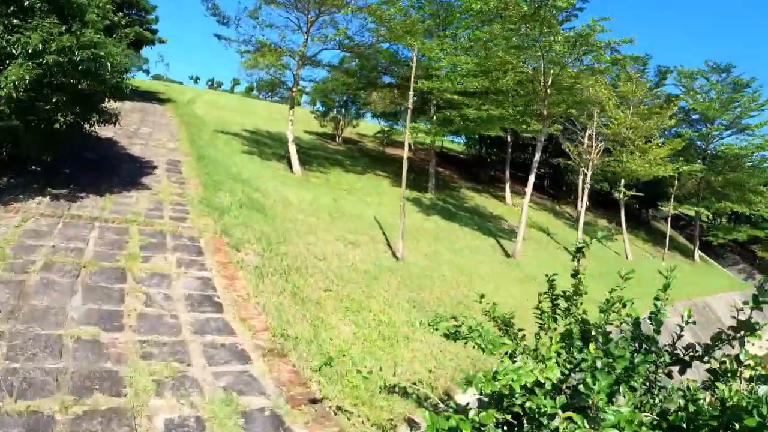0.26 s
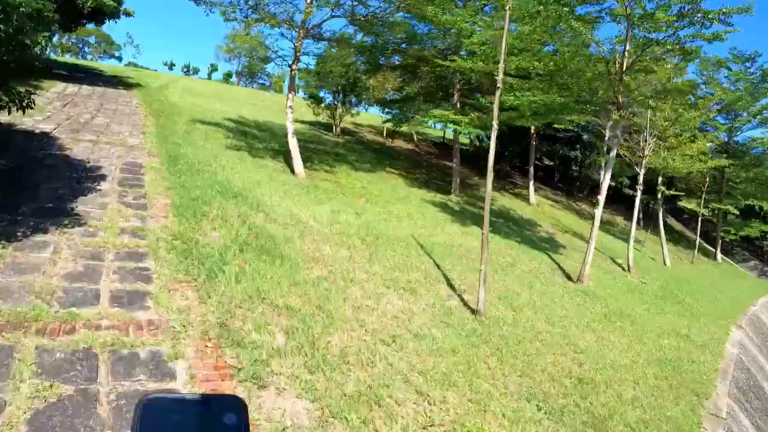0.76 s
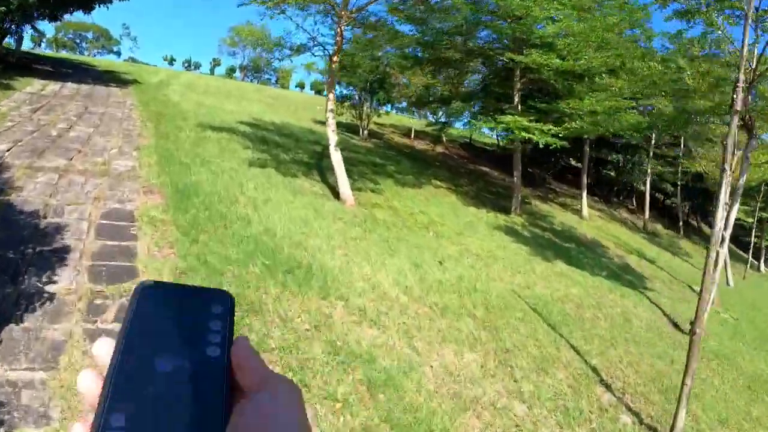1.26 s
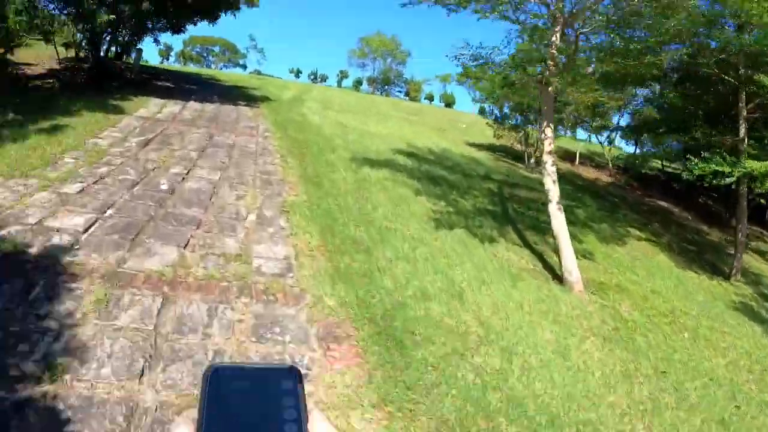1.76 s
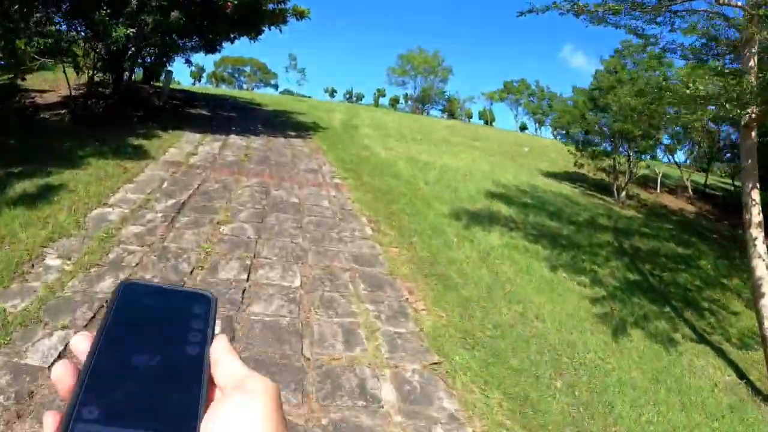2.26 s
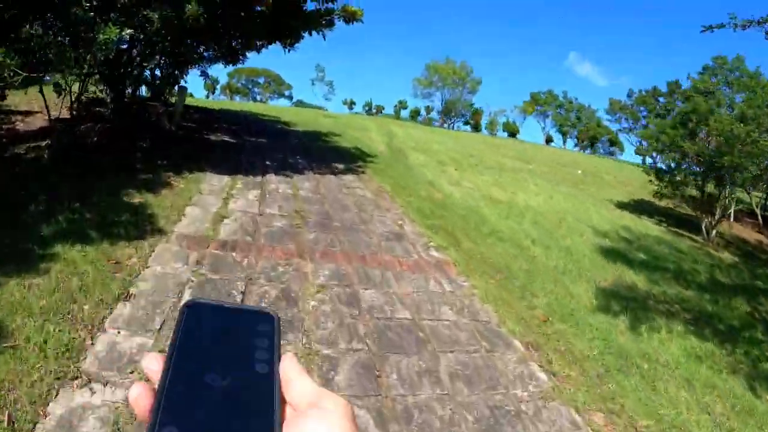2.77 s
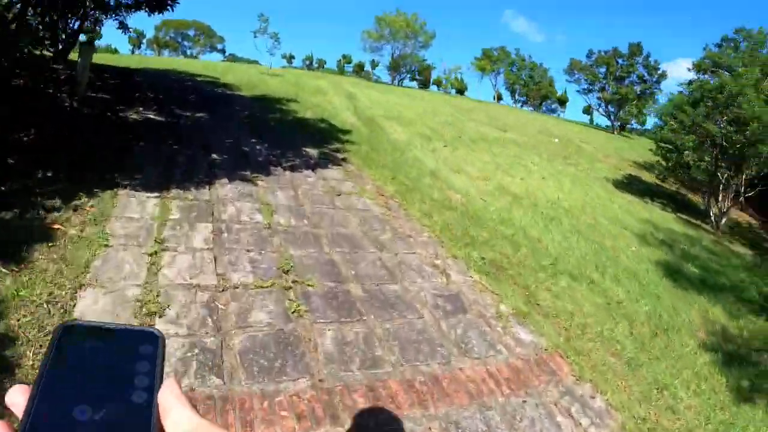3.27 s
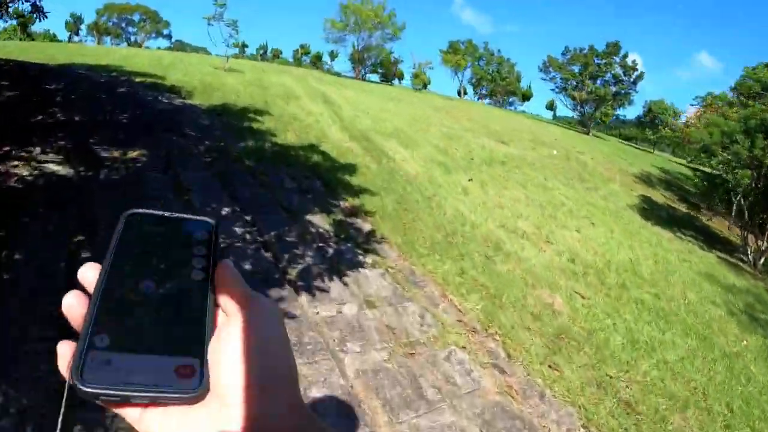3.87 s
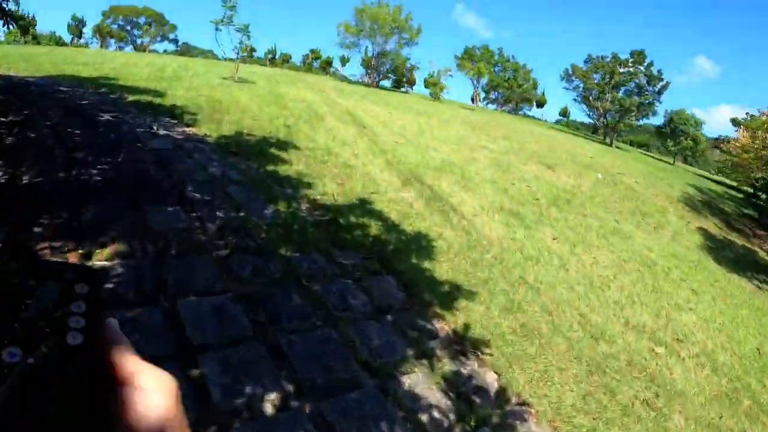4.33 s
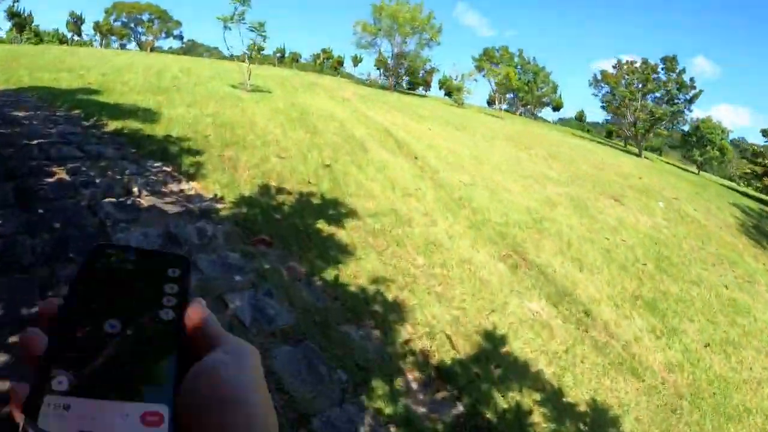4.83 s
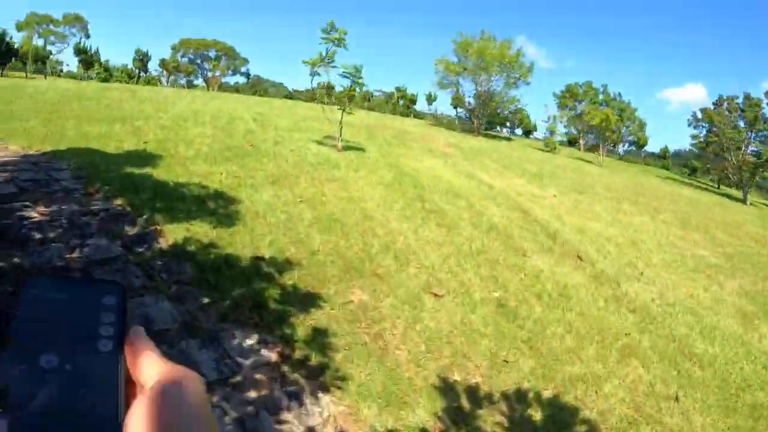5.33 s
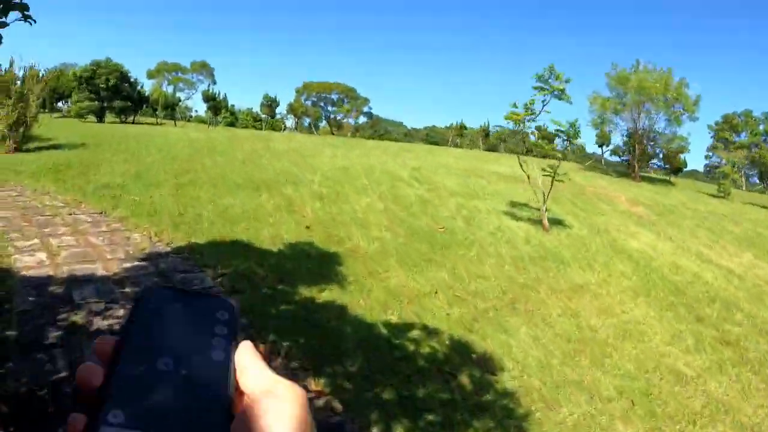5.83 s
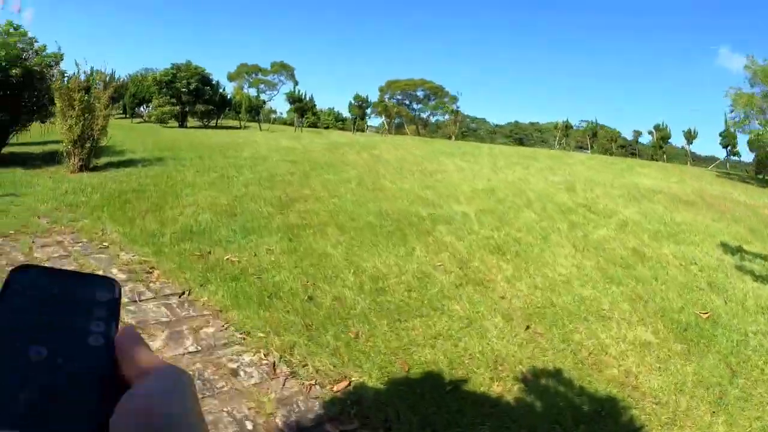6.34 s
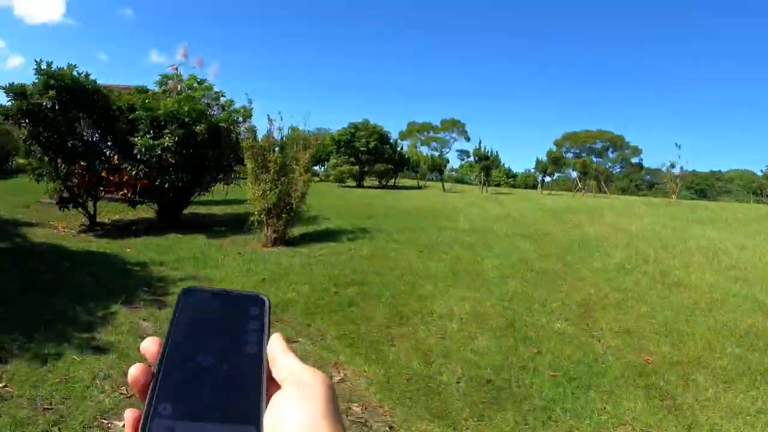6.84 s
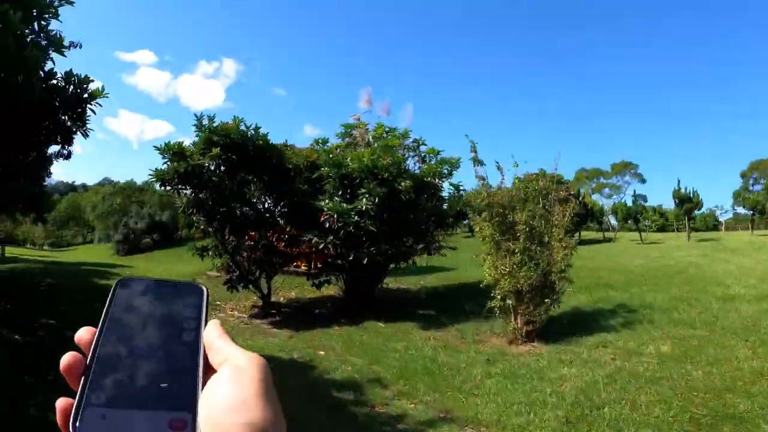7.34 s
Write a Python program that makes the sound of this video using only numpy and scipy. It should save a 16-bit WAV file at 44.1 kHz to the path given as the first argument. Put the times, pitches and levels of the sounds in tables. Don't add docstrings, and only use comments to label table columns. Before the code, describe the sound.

From 0 to about 2.1 seconds the sound is quiet and mono: soft low footfalls on stone, a few firmer at the very start, small dry ticks, short strap rubs and faint air. Around 2.2 seconds it opens to stereo, and from 2.35 to 2.8 a cluster of loud hollow plastic clacks hits close at the right, thinner at the left. From 3 to 4.6 come lighter rattles, a scrape near 3.3, knocks near 3.45 and 4.0, gritty steps and crackling grass swishes over steady cloth rustle. Between 4.6 and 6.3 steps thump quickly with moderate, scattered knocks and snaps. A hard clack lands at 6.47, more follow, and from 7.1 to 7.6 rapid heavy knocks, shoves and thuds crowd together, slightly overloaded. Wind and leaf hiss remain faint throughout.

```python
import sys
import numpy as np
from scipy import signal
from scipy.io import wavfile

SR = 44100
rng = np.random.default_rng(int(sys.argv[2]) if len(sys.argv) > 2 else 0)


def linear_from_db(decibels):
    return 10 ** (np.asarray(decibels, float) / 20)


def store_pcm(level_fs):
    pcm = np.round(np.clip(level_fs, -1, 1) * 32767).astype(np.int16)
    wavfile.write(sys.argv[1], SR, np.atleast_2d(pcm).T)


N = 335160
REVERSED = np.array([[-1], [1]])


def ring(x, hz, t60):
    radius, angle = linear_from_db(-60 / (t60 * SR)), 2 * np.pi * hz / SR
    return signal.lfilter([0, np.sin(angle)], [1, -2 * radius * np.cos(angle), radius ** 2], x + 1e-18)


def band(x, lo_hz, hi_hz):
    return signal.sosfilt(signal.butter(2, [lo_hz, hi_hz], "band", fs=SR, output="sos"), x + 1e-18)


def soft(x, hz):
    return signal.sosfilt(signal.butter(4, hz, fs=SR, output="sos"), x + 1e-18)


def rms_one(x):
    return x / np.sqrt(np.mean(x ** 2))


def by_air(x):
    return np.array([x, np.roll(x, shift=2)])


def blows(times, level_db, spread_s, count):
    out, chance = np.zeros(N), rng.random((len(times), 2 * count))
    for k in range(count):
        late = chance[:, k] * (k > 0)
        at = np.clip(((times + spread_s * late) * SR).astype(int), 0, N - 1)
        push = np.cbrt(2 * chance[:, count + k] - 1) if k else -1
        np.add.at(out, at, push * linear_from_db(level_db) * (1 - .65 * late))
    return out


def swings(rows):
    s, level_db, hz, swell = np.transpose(rows)[:, :, None]
    t, out = np.arange(int(.04 * SR)) / SR, np.zeros(N + SR)
    u = t / np.clip(swell, .001, .008)
    envelope = (u * np.exp(1 - u)) ** 2
    at = (s * SR).astype(int) + np.arange(len(t))
    np.add.at(out, at, -linear_from_db(level_db) * envelope * np.sin(2 * np.pi * hz * t))
    return out[:N]


def strokes(rows):
    power = np.zeros(N)
    for centre, length, level_db in rows:
        at = np.arange(max(int((centre - 2 * length) * SR), 0), min(int((centre + length) * SR), N))
        u = (at / SR - centre) / length
        power[at] += linear_from_db(2 * level_db) * np.exp(-np.where(u < 0, 5.0, 11.0) * u ** 2)
    return np.sqrt(power)


def grains(per_s, spread_db):
    sizes = linear_from_db(spread_db * np.minimum(rng.exponential(1, N), 4)) * rng.choice([-1, 1], N)
    return rms_one(sizes * (rng.random(N) < per_s / SR))


def flicker(hz, depth_db):
    lowpass = signal.butter(2, hz, fs=SR / 20, output="sos")
    slow = signal.sosfilt(lowpass, rng.standard_normal(N // 20 + 999))[998:]
    slow = np.minimum(rms_one(slow), 1.2)
    return linear_from_db(depth_db * np.interp(np.arange(N) / 20, np.arange(len(slow)), slow))


def casing(force, modes, uneven=None):
    out = np.zeros((2, N))
    for k, (hz, right_db, left_db, t60) in enumerate(modes):
        share = 1 if uneven is None else uneven[k]
        left_sign = 1 if 3500 < hz < 4500 or hz > 7800 else -1
        gains = np.array([[left_sign * linear_from_db(left_db)], [linear_from_db(right_db)]])
        out += ring(force * share, hz, min(t60, .02)) * (-1) ** k * gains
    return out


# start in seconds, knock level in dB,
# hard tick level in dB, battery door pitch in Hz.
KNOCKS = [(2.354, -18.5, -27.5, 900), (2.474, -13, -25.5, 897), (2.552, -21.5, -40, 950),
          (2.674, -18, -28, 902), (2.782, -11, -21.5, 945), (3.124, -40, -50, 920), (3.255, -32, -52, 1270),
          (3.448, -19.5, -46.5, 870), (3.531, -27, -52, 939), (3.995, -19.5, -32, 845),
          (4.025, -34, -44, 760), (4.622, -45, -35.5, 810), (5.027, -24.5, -43.5, 924),
          (5.351, -21.5, -45, 867), (5.438, -39, -54, 950), (5.691, -20, -26.5, 930),
          (5.808, -29, -55, 760), (6.026, -20.5, -52, 895), (6.466, -10.5, -23.5, 925),
          (6.685, -17.5, -45.5, 900), (6.837, -21.5, -37, 864), (7.018, -16, -42.5, 905),
          (7.127, -11.5, -22.5, 980), (7.161, -19.5, -44.5, 870), (7.205, -23.5, -48.5, 940),
          (7.277, -11, -30, 942), (7.329, -15, -24, 940), (7.443, -11, -22.5, 990), (7.477, -19, -47, 890),
          (7.561, -32, -64, 970)]
# start in seconds, peak in dB, door pitch in Hz.
BOUNCES = [(2.179, -33, 890), (2.213, -42, 875), (2.496, -31.5, 910), (2.807, -30, 920),
           (2.863, -31.5, 870), (2.965, -44, 865), (2.999, -51, 880), (3.113, -41, 890),
           (3.182, -37.5, 934), (3.235, -39.5, 784), (3.277, -42, 670), (3.297, -42, 860), (3.37, -49, 840),
           (3.384, -43.5, 850), (3.472, -31, 900), (3.499, -35.5, 755), (3.506, -35.5, 860),
           (3.563, -43, 820), (3.743, -40.5, 880), (3.922, -33.5, 1000), (3.982, -38, 786),
           (4.064, -49, 845), (4.089, -47, 920), (4.185, -45.5, 810), (4.271, -48, 725),
           (4.315, -37.5, 830), (4.322, -38, 890), (4.336, -39.5, 830), (4.366, -40.5, 880),
           (4.788, -29, 1084), (4.855, -39, 820), (4.906, -34, 875), (5.106, -39, 632), (5.176, -32.5, 925),
           (5.182, -33, 810), (5.2, -40, 955), (5.275, -32, 1350), (5.409, -56, 988), (5.464, -41, 760),
           (5.489, -31.5, 870), (5.541, -40, 905), (5.841, -31.5, 930), (5.854, -34.5, 1000),
           (6.032, -41.5, 990), (6.205, -35, 890), (6.228, -39, 800), (6.277, -41, 840), (6.321, -41, 870),
           (6.355, -27.5, 884), (6.398, -44.5, 780), (6.503, -31.5, 780), (6.518, -35.5, 820),
           (6.532, -39.5, 1130), (6.736, -39, 760), (6.794, -36.5, 714), (6.863, -31.5, 870),
           (7.268, -28.5, 1000), (7.364, -45, 670), (7.45, -25.5, 650), (7.529, -43, 915)]


def weights():
    rows = [(s, db, hz) for s, db, _, hz in KNOCKS] + [(s, db + 3.5, hz) for s, db, hz in BOUNCES]
    return np.transpose(rows)


def battery_door():
    s, knock_db, hz = weights()
    swell = 0.0016 * 940 / hz * rng.uniform(.85, 1.2, len(s))
    door = swings(np.c_[s - .0003, knock_db + 1.0, hz, swell])
    return_db = knock_db - 19.5 + rng.normal(0, 3, len(s))
    door = door + swings(np.c_[s + 0.0055, return_db, hz * .97, swell])
    edge = blows(s, knock_db - 9.0 + rng.normal(0, 0.79, len(s)), spread_s=0.00282, count=3)
    door = door + soft(linear_from_db(2.5) * ring(edge, 1396, 0.008) - ring(edge, 1717, 0.013), 2460)
    return door * linear_from_db([[-33], [0]])


# start in seconds, level in dB.
TICKS = [(.004, -34), (.156, -35.5), (.258, -59), (.275, -43), (.3075, -35), (.471, -38), (.541, -44),
         (.587, -47), (.653, -53.5), (.781, -41.5), (.924, -40), (1.087, -49), (1.134, -60), (1.356, -40.5),
         (1.401, -57), (1.717, -36), (1.845, -47), (2.933, -73), (4.955, -70), (5.105, -66), (5.276, -52),
         (5.502, -51)]
# pitch in Hz, level at the right port in dB,
# level at the left port in dB, t60 in seconds.
HARD_MODES = [
    (1620, 14, -19, 0.0073),
    (2135, 7, -14, 0.0067),
    (2504, 10, -10.5, 0.0085),
    (3700, -22, -18.5, 0.024),
    (5050, -13, -24, 0.03),
    (5250, 11.5, -6, 0.0065),
    (6250, 6.5, -3, 0.0066),
    (6790, 7.5, 0.5, 0.0029),
    (9460, -10, -26.5, 0.0076),
]


def hard_ticks():
    ticks = TICKS + [(s, tick_db) for s, _, tick_db, _ in KNOCKS] + [(s, db - 41) for s, db, _ in BOUNCES]
    s, tick_db = np.transpose(sorted(ticks))
    shares = linear_from_db(4 * rng.standard_normal((len(s), len(HARD_MODES))))
    current = np.searchsorted(s[1:] - .005, np.arange(N) / SR)
    touch = blows(s, tick_db - 3.5, spread_s=.0025, count=4)
    modes = casing(touch, HARD_MODES, shares[current].T)
    body = band(touch, 1300, 5700) * linear_from_db([[-8.0], [9.0]]) * REVERSED
    left_edge = band(touch, 3750, 4200) * [[linear_from_db(4.0)], [0]]
    return soft(modes + body + left_edge, 9600)


# start in seconds, peak in dB, pitch in Hz, swell in seconds.
THUDS = [(2.47, -39.5, 625, 0.0042), (2.548, -49, 635, 0.0043), (2.671, -47, 596, 0.0034),
         (2.78, -38.5, 595, 0.004), (2.925, -53, 590, 0.0028), (2.967, -46, 507, 0.0023),
         (3.257, -54, 560, 0.009), (3.368, -48, 460, 0.0025), (3.501, -47, 553, 0.006),
         (3.581, -44, 350, 0.002), (3.744, -59, 600, 0.0023), (3.92, -51, 553, 0.0064),
         (3.994, -32.5, 395, 0.0014), (4.027, -42, 570, 0.0036), (4.181, -55.5, 340, 0.006),
         (4.271, -45.5, 390, 0.0034), (4.301, -49, 550, 0.0021), (4.622, -37.5, 418, 0.0034),
         (4.786, -48, 524, 0.0046), (5.024, -57, 566, 0.0025), (5.103, -45, 610, 0.0035),
         (5.177, -50, 456, 0.0046), (5.276, -50.5, 540, 0.0083), (5.347, -51, 626, 0.0031),
         (5.438, -33, 377, 0.0021), (5.688, -48.5, 594, 0.0037), (5.78, -41.5, 305, 0.0032),
         (5.953, -49, 478, 0.0036), (6.112, -56, 322, 0.0035), (6.323, -50, 616, 0.0036),
         (6.398, -51, 310, 0.0031), (6.462, -41, 630, 0.0025), (6.68, -40, 618, 0.0046),
         (6.988, -46, 533, 0.0031), (7.013, -34.5, 353, 0.003), (7.123, -33.5, 553, 0.0044),
         (7.184, -31.5, 417, 0.005), (7.265, -38, 600, 0.0044), (7.32, -39, 398, 0.0035),
         (7.375, -50, 441, 0.0039), (7.448, -24.5, 304, 0.0019)]


def shell_thuds():
    s, knock_db, _ = weights()
    thud = blows(s + 0.0028, knock_db - 66, spread_s=0.0052, count=4)
    shell = ring(ring(thud, 278, 0.11), 464, 0.047) + linear_from_db(8.5) * swings(THUDS)
    return shell * linear_from_db([[-16], [0]]) * REVERSED


# start in seconds, peak in dB.
SNAPS = [(2.9274, -27.5), (2.9668, -40), (3.086, -49), (3.113, -38), (3.396, -41), (3.4186, -50),
         (3.5644, -51), (4.3158, -33), (4.326, -35.5), (4.337, -26), (5.505, -34.5), (5.708, -39),
         (4.4485, -32), (4.4719, -31.5), (4.5407, -35), (4.644, -43), (3.733, -38), (5.057, -38),
         (5.137, -40), (5.1999, -39), (5.409, -33), (6.2756, -48), (6.4403, -46), (6.5356, -34),
         (7.0382, -37), (7.266, -43), (7.5871, -29)]
# start in seconds, peak in dB.
EARLY_SNAPS = [
    (0.0248, -50.5),
    (0.241, -57),
    (0.2498, -54),
    (0.2564, -40.5),
    (0.2623, -44),
    (0.4254, -63),
    (0.613, -53),
    (1.098, -64),
    (1.1209, -59),
    (1.135, -46),
]


def edge_snaps():
    s, snap_db = np.transpose([(s, db + 10) for s, db in EARLY_SNAPS] + SNAPS)
    snap = blows(s, snap_db - 3.0, spread_s=0.0018, count=4)
    return soft(casing(snap, RUB_MODES[2:]), 4000) + linear_from_db(-20.5) * casing(snap, RUB_BRIGHT_MODES[1:])


# centre in seconds, length in seconds, level in dB.
JOLTS = [
    (.05, 0.14, -49),
    (.14, 0.025, -39),
    (1.39, 0.016, -49),
    (7.14, 0.03, -32.5),
    (7.19, 0.02, -30),
    (7.222, 0.031, -37),
    (7.268, 0.056, -43),
    (7.335, 0.045, -33.5),
    (7.392, 0.027, -42),
    (7.465, 0.037, -31),
]


def jolts():
    slips = grains(per_s=830, spread_db=7.0) * strokes(JOLTS)
    low = ring(slips, 300, 0.034) - ring(slips, 443, 0.024) + linear_from_db(6.5) * ring(slips, 675, 0.0054)
    return soft(low, 1700) * linear_from_db([[-38], [-21]])


# centre in seconds, length in seconds, level in dB, brightness in dB.
FAST_RUBS = [(0.1, 0.0064, -63, 2), (0.187, 0.0066, -48, 0), (0.266, 0.037, -53, -10),
             (0.64, 0.028, -53.5, 0), (0.803, 0.033, -53, -6), (0.952, 0.014, -50, -1),
             (1.241, 0.026, -52, -6), (1.269, 0.0084, -59, 7.5), (1.415, 0.025, -56.5, 2),
             (1.581, 0.016, -56, 6.5), (1.867, 0.018, -46.5, -1), (2.02, 0.025, -49.5, -8),
             (2.37, 0.054, -43, -14), (3.329, 0.025, -34, -6.5), (3.665, 0.0081, -58, 15.5),
             (3.837, 0.02, -45.5, -3.5), (4.015, 0.054, -37, -9.5), (4.184, 0.043, -48.5, -14),
             (4.521, 0.11, -52.5, -9.5), (4.71, 0.081, -48.5, -13), (4.847, 0.091, -48, -9),
             (5.062, 0.14, -51.5, -4), (5.192, 0.054, -50, -9), (5.643, 0.029, -54.5, 3),
             (5.859, 0.034, -42, -14), (6.196, 0.042, -46.5, -11), (6.347, 0.027, -52.5, -7),
             (6.472, 0.038, -41, -19), (7.132, 0.023, -39.5, -30), (7.277, 0.021, -45, -21),
             (7.461, 0.067, -46.5, -24)]
# centre in seconds, length in seconds, level in dB.
SLOW_RUBS = [(0.428, 0.012, -49), (0.478, 0.0083, -58), (0.588, 0.01, -46), (0.85, 0.0063, -54),
             (1.123, 0.042, -50.5), (1.74, 0.014, -49), (2.203, 0.036, -43.5), (2.246, 0.009, -55),
             (2.504, 0.1, -50.5), (2.785, 0.02, -43), (2.845, 0.023, -46), (2.989, 0.038, -49),
             (3.178, 0.027, -42), (3.508, 0.072, -45), (4.278, 0.041, -51.5), (4.337, 0.037, -45.5),
             (5.343, 0.052, -46.5), (5.477, 0.08, -49.5), (6.015, 0.046, -46.5), (6.135, 0.036, -49.5),
             (6.277, 0.034, -51.5), (6.4, 0.02, -52), (6.682, 0.031, -47), (6.802, 0.16, -48),
             (7.003, 0.05, -43.5), (7.33, 0.021, -41.5)]
# pitch in Hz, level at the right port in dB,
# level at the left port in dB, t60 in seconds.
RUB_MODES = [
    (377, -1, -16, 0.0053),
    (863, -6, -39, 0.015),
    (1787, 3, -13, 0.0041),
    (2540, 5.5, -8, 0.0086),
    (3050, 7, -10, 0.0044),
    (3960, 10, -6, 0.00059),
]
RUB_BRIGHT_MODES = [
    (5300, 12, -3, 0.0029),
    (6300, 3, 4, 0.00036),
    (8200, -3, -5.5, 0.0045),
]


def rubbing(cloth_db):
    rows = np.array(FAST_RUBS + [(*row, -15.5) for row in SLOW_RUBS])
    slips = grains(per_s=2800, spread_db=1.5) * flicker(50, depth_db=3.5)
    pressure = np.hypot(strokes(rows[:, :3]), linear_from_db(cloth_db) * flicker(22, depth_db=5.5))
    bright = strokes(np.c_[rows[:, :2], rows[:, 2] + rows[:, 3]])
    uneven = [flicker(25, depth_db=2.5) for _ in RUB_MODES]
    prickle = grains(per_s=260, spread_db=4) * flicker(14, depth_db=6) * linear_from_db(cloth_db - 4)
    dull = soft(casing(slips * pressure + prickle, RUB_MODES, uneven), 4130)
    bright_force = slips * (bright + linear_from_db(-46.0) * pressure) + linear_from_db(-13.5) * prickle
    return dull * linear_from_db(-15.5) + soft(casing(bright_force, RUB_BRIGHT_MODES), 7400) * linear_from_db(-22.5)


# start in seconds, thump level in dB, slap level in dB.
FOOTFALLS = [(.004, -24, -56), (0.099, -26.5, -69), (.156, -16.5, -56), (0.259, -27.5, -67),
             (0.275, -25, -48), (0.408, -33, -58), (0.473, -35, -55.5), (0.541, -32, -58),
             (0.589, -30, -57), (.846, -39.5, -78), (0.893, -34.5, -63), (0.923, -38, -80),
             (1.09, -38, -54), (1.132, -61, -64), (1.192, -19.5, -86), (1.203, -33, -57),
             (1.342, -38, -56), (1.358, -25.5, -54), (1.403, -24.5, -51), (1.498, -37, -60),
             (1.523, -26.5, -60), (1.564, -26.5, -69), (1.715, -34.5, -57), (1.751, -26, -84),
             (1.793, -34, -57), (1.954, -38, -56), (2.014, -37, -61), (2.116, -64, -64),
             (2.281, -53, -54.5), (0.725, -58, -69),
             (2.453, -21.5, -45), (2.601, -56, -39.5), (2.761, -46, -50), (2.933, -32, -35),
         (3.126, -41, -43.5), (3.255, -57, -35.5), (3.583, -19.5, -39.5), (3.745, -33, -37),
         (3.923, -50, -38), (4.087, -22.5, -40), (4.271, -26, -43.5), (4.451, -66, -41.5),
         (4.622, -15.5, -30.5), (4.788, -21.5, -36.5), (4.956, -22, -34), (5.106, -43, -38.5),
         (5.276, -21, -37.5), (5.435, -21, -35.5), (5.779, -18, -42.5), (5.955, -22.5, -33),
         (6.109, -63, -46), (6.323, -68, -34.5), (6.441, -65, -50), (6.683, -62, -41), (6.86, -26, -46),
         (7.441, -56, -38), (7.597, -50, -36)]
SCUFFS = [(3.505, -43, -46), (3.996, -51, -31.5), (4.026, -31, -51), (4.313, -65, -49), (4.334, -27, -63),
          (4.852, -30, -57), (5.465, -53, -43), (5.806, -58, -41.5), (6.028, -68, -45), (6.328, -31, -40),
          (6.737, -53, -48), (7.274, -29, -38), (7.475, -56, -50)]
# start in seconds, peak in dB, pitch in Hz, swell in seconds.
HEELS = [(0.047, -42, 202, 0.0025), (0.046, -57, 475, 0.0072), (0.097, -66, 310, 0.0038),
         (0.129, -49, 320, 0.0034), (0.153, -34.5, 415, 0.0015), (0.259, -45.5, 512, 0.0044),
         (0.426, -62, 368, 0.0036), (0.425, -54.5, 440, 0.0059), (0.541, -62, 530, 0.0042),
         (0.889, -67, 563, 0.0093), (1.19, -47.5, 409, 0.0071), (1.34, -47.5, 452, 0.0015),
         (1.38, -43, 224, 0.0065), (1.519, -50.5, 337, 0.0028), (1.563, -38, 416, 0.0018),
         (1.713, -61, 444, 0.0023), (1.75, -44.5, 234, 0.0042), (2.013, -54, 265, 0.0034)]


def footfalls():
    s, thump_db, slap_db = np.transpose(FOOTFALLS + SCUFFS)
    drag = blows(s - .002, thump_db - 45.0, spread_s=0.01406, count=5)
    thump = ring(ring(drag, 264, 0.02), 544, 0.018)
    grit = blows(s, slap_db + 12, spread_s=0.006, count=8)
    slap = ring(grit, 652, 0.0044) * linear_from_db(-8.0)
    slap = slap - ring(grit, 1650, 0.0026) * linear_from_db(-3.0) + ring(grit, 3240, 0.00064) * linear_from_db(-3.5)
    return by_air(thump + swings(HEELS) + soft(slap, 7400))


# centre in seconds, length in seconds, level in dB.
SWISHES = [(1.644, 0.0094, -71), (2.216, 0.0054, -59), (2.456, 0.0074, -53), (2.536, 0.0093, -61),
           (2.933, 0.0083, -46.5), (3.022, 0.01, -61), (3.085, 0.031, -60.5), (3.263, 0.011, -47),
           (3.64, 0.018, -63), (3.68, 0.022, -52.5), (4.28, 0.18, -71.5), (3.743, 0.023, -53.5),
           (4.194, 0.012, -54), (4.475, 0.024, -74), (4.525, 0.017, -57), (4.558, 0.015, -52.5),
           (4.593, 0.0097, -64), (4.622, 0.021, -48.5), (4.652, 0.0081, -58), (4.718, 0.011, -55),
           (4.88, 0.0078, -48), (6.21, 0.0088, -57), (6.279, 0.0073, -60), (6.464, 0.0085, -50),
           (6.653, 0.013, -57), (6.76, 0.049, -67), (6.929, 0.013, -59.5), (6.987, 0.0089, -62),
           (7.106, 0.01, -50), (7.269, 0.0068, -45), (7.4, 0.025, -64), (7.444, 0.026, -46.5),
           (7.56, 0.011, -46)]


def swish():
    shared, left, right = [grains(per_s=6000, spread_db=2.5) for _ in range(3)]
    crackle = 1.6 * by_air(shared) + np.array([left, right])
    crackle = crackle * strokes(SWISHES) * flicker(120, depth_db=3)
    return band(crackle, 13000, 18000) * linear_from_db(-19.5) - band(crackle, 930, 8260) * linear_from_db(-3.5)


SHEEN_S = (1.73, 3.68, 4.48, 4.57, 5.04, 6.75, 7.41)
# length in seconds, level in dB, pitch in Hz.
SHEENS = [
    (0.16, -92, 11400),
    (0.022, -63, 11500),
    (0.027, -70, 11300),
    (0.041, -78, 13000),
    (0.11, -63.5, 5000),
    (.05, -85, 14000),
    (0.042, -76, 13000),
]


def sleeve():
    fibres = np.array([grains(per_s=6000, spread_db=2.5) for _ in range(2)])
    out = np.zeros((2, N))
    for s, (length, db, hz) in zip(SHEEN_S, SHEENS):
        out += band(fibres, hz * 0.94, hz * 1.32) * strokes([(s, length, db)])
    return out * linear_from_db(8.5)


def far_leaves(hiss_db):
    far = signal.lfilter([1], [1, -.75], rng.standard_normal((2, N)))
    gusts = flicker(30, depth_db=6)
    leaves = soft(far, 9500) * gusts + band(far, 9500, 16000) * gusts[::-1]
    return leaves * linear_from_db(hiss_db + 3) + linear_from_db(-94) * far[:, ::-1]


def wind(rumble_db, air_db):
    white = rng.standard_normal((2, N))
    low = rms_one(band(white, 191, 550)) + linear_from_db(-10.5) * rms_one(band(white, 33, 59))
    foliage = rms_one(band(white[::-1], 1640, 3030)) * flicker(18, depth_db=11.5)
    lumps = np.array([flicker(25, depth_db=4.5), flicker(22.8, depth_db=5.5)])
    return (low + linear_from_db([[-7], [-12]]) * foliage) * lumps * linear_from_db(np.array([air_db, rumble_db]) + 10.5)


# time in seconds, level in dB above a steady trot.
JOSTLE = [
    (0, -34),
    (.4, -35),
    (2.1, -41.5),
    (2.3, -9),
    (3.6, -1),
    (4.4, -7.5),
    (5.602, -6.5),
    (7.2, -3.5),
    (7.6, 2.5),
]
# level at a steady trot in dB, share of the jostle followed.
BEDS = [
    (-56.5, 0.95),
    (-69, 1.5),
    (-74, 0.38),
    (-85, 0.4),
]


def scene():
    jostle_db = np.interp(np.arange(N) / SR, *np.transpose(JOSTLE))
    cloth_db, rumble_db, air_db, hiss_db = [db + share * jostle_db for db, share in BEDS]
    strap = hard_ticks() + edge_snaps() + battery_door() + shell_thuds() + jolts() + rubbing(cloth_db)
    ground = footfalls() + swish() + sleeve()
    return strap + ground + far_leaves(hiss_db) + wind(rumble_db, air_db)


def band_limit(x):
    return signal.sosfilt(signal.butter(12, 15830, fs=SR, output="sos"), x)


STEREO_FROM_S = (2.155, 2.3)


def record(dry):
    low_cut = signal.butter(4, 266, "high", fs=SR, output="sos")
    left, right = signal.sosfilt(low_cut, dry) + linear_from_db(-22.5) * dry
    opened = np.interp(np.arange(N) / SR, STEREO_FROM_S, [0, 1])
    pair = np.array([left, left + opened * (right - left)])
    pair = pair + 0.16 * pair ** 2
    ceiling = 0.43
    limited = pair / (1 + np.abs(pair / ceiling) ** 4) ** (1 / 4)
    limited = signal.sosfilt(signal.cheby2(10, 50, 16600, fs=SR, output="sos"), limited)
    return band_limit(limited)


dry = scene()
out = record(dry)
store_pcm(out)
```